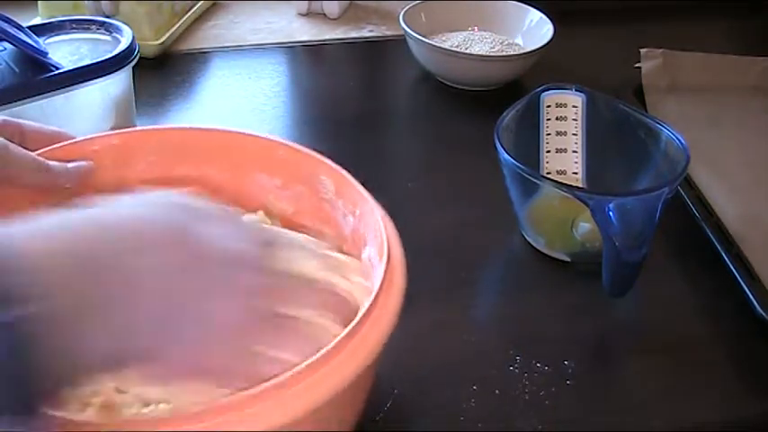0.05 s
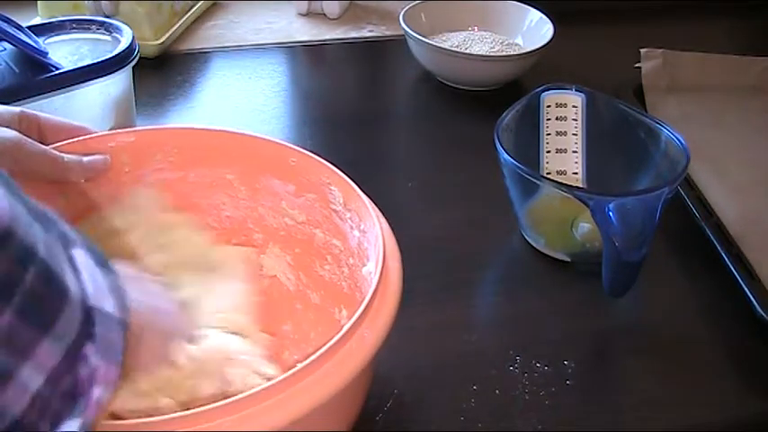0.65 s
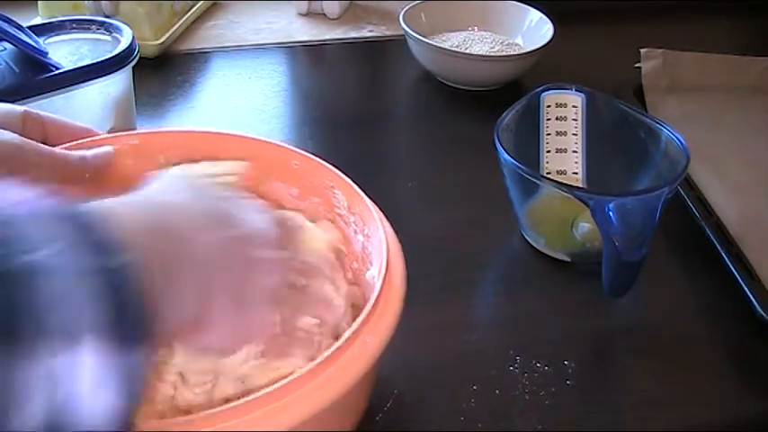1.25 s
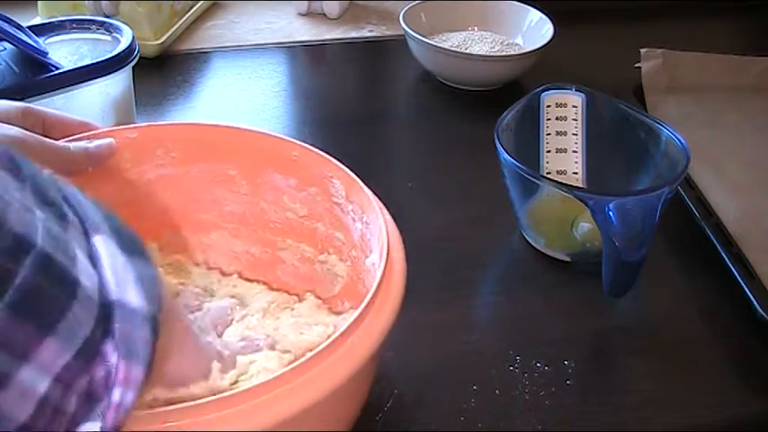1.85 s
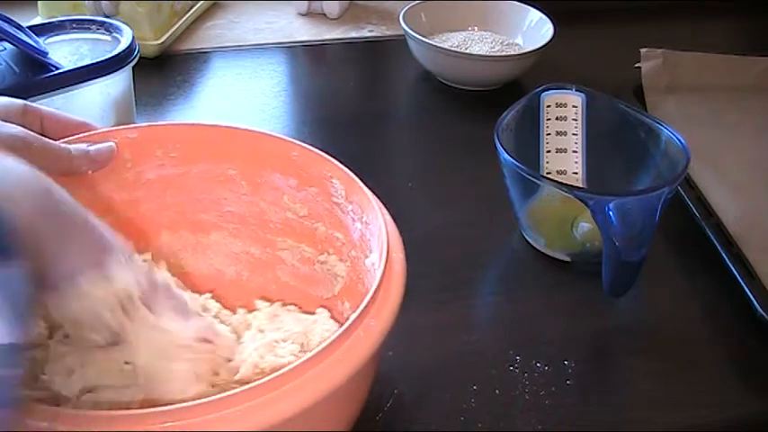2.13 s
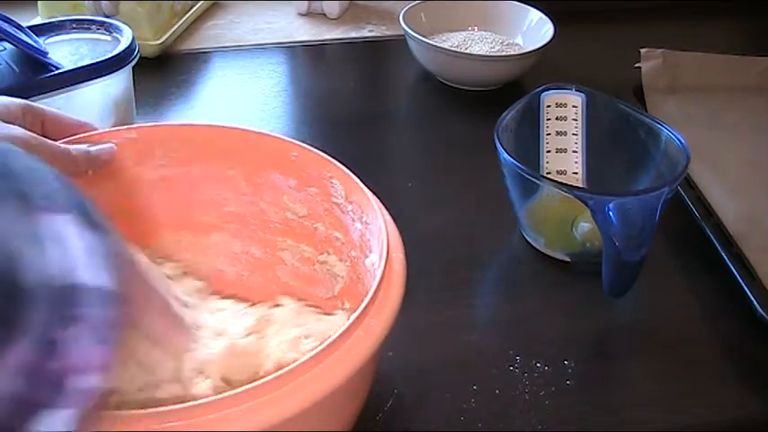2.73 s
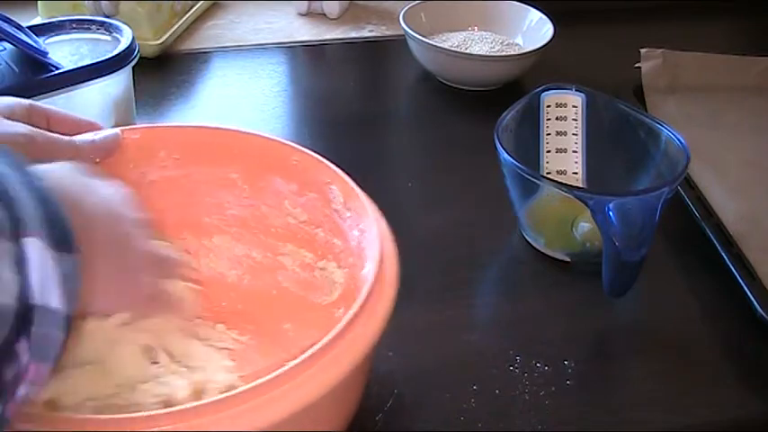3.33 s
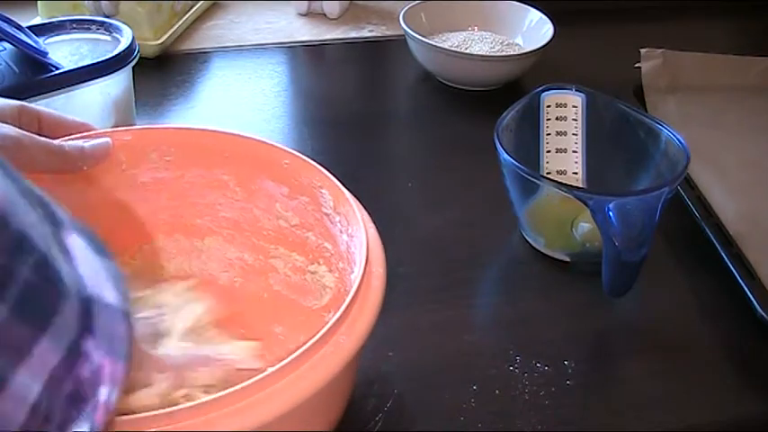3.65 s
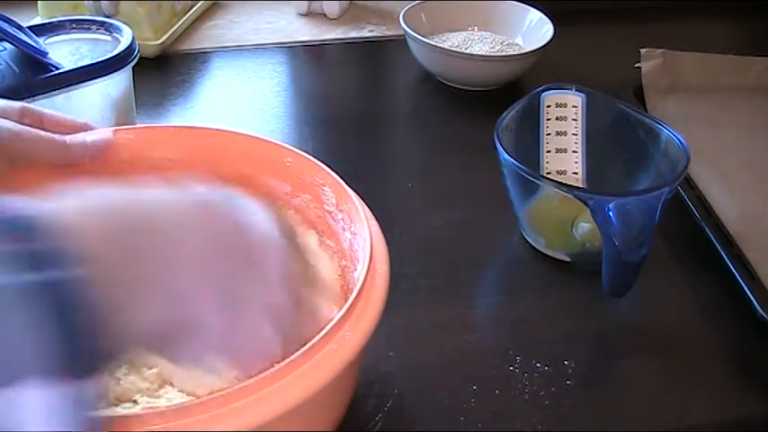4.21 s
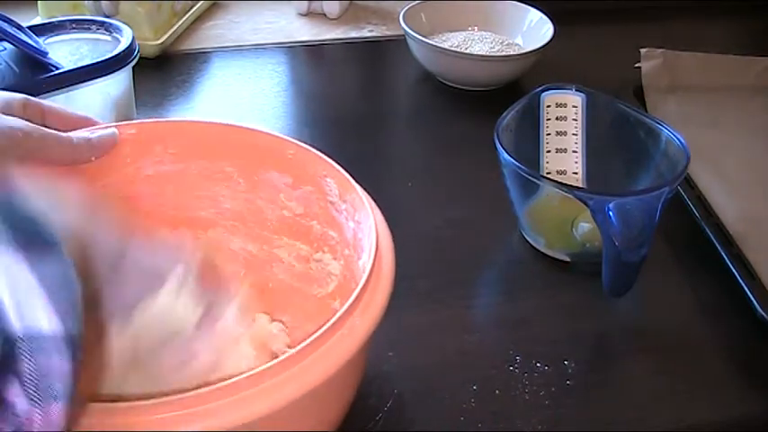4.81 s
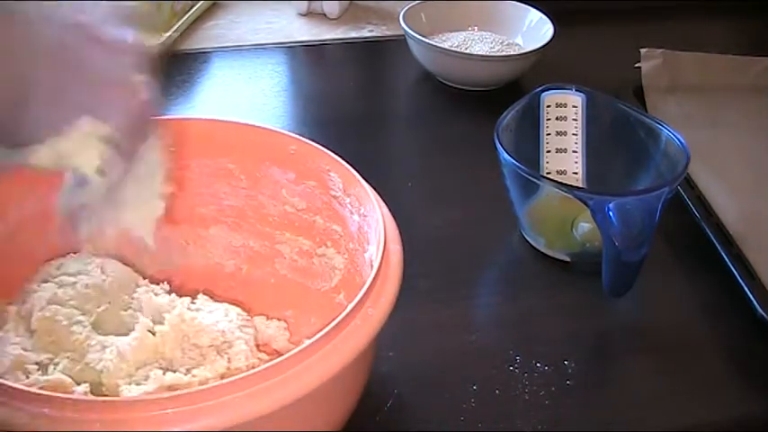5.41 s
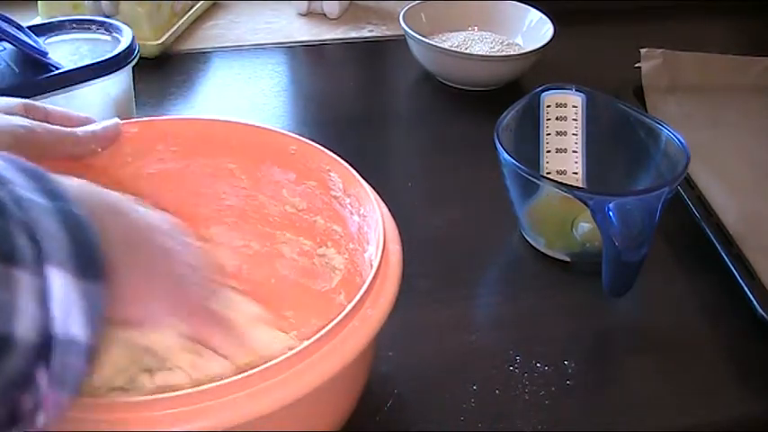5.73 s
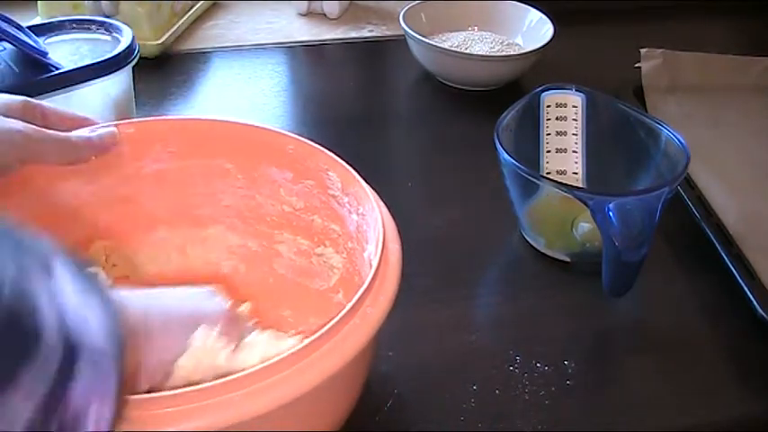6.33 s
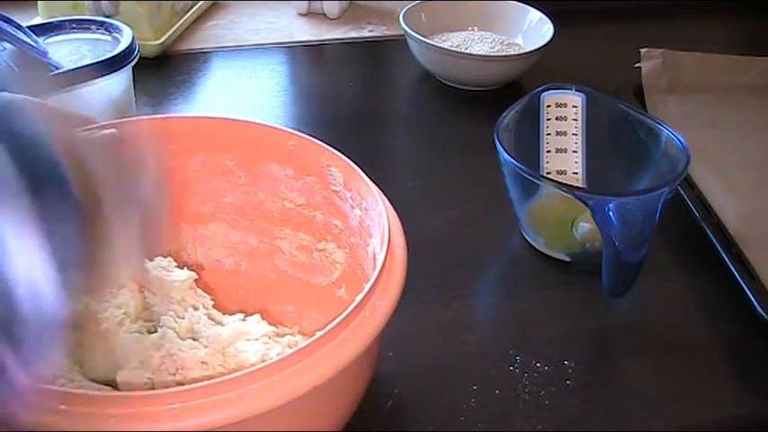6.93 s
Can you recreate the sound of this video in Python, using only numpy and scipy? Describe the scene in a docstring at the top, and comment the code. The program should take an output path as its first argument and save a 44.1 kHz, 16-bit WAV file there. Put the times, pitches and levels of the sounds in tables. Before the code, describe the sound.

Close up in a small kitchen, a plastic bowl bumps irregularly against a counter as a hand works dough inside it. Between the knocks come soft floury swishes, hollow pressing sounds and tiny tacky clicks. Thin, faint squeaks of skin on plastic appear shortly before the loudest thump and again later. The kneading goes on to a last light knock, heard in stereo with short room reverberation and a low hiss.

```python
"""A hand kneads soft, floury dough in a plastic bowl on a kitchen counter, close to a stereo microphone.
From the start, over a soft hiss, strokes brush the wall, drag and press the dough and rock the bowl so
that it knocks on the counter; sticky dough ticks as it lets go. Near 2 s skin squeaks on the plastic,
and just before 3 s the bowl lands hardest. More strokes and knocks follow, with squeaks again near 5 s
and a last light knock just before 7 s. The small room answers throughout."""
import sys
import numpy as np
from scipy import signal
from scipy.fft import rfft, irfft
from scipy.io import wavfile
from scipy.ndimage import uniform_filter1d

SR = 44100
rng = np.random.default_rng(int(sys.argv[2]) if len(sys.argv) > 2 else 0)


def persist_wave(psi):
    """Save psi, clipped to +-1, as 16-bit WAV."""
    counts = np.round(np.clip(psi, -1, 1) * 32767).astype(np.int16)
    wavfile.write(sys.argv[1], SR, np.atleast_2d(counts).T)


N = 307068


def undb(db):
    """Decibels to gain."""
    return 10 ** (np.asarray(db) / 20)


def unit_rms(x):
    """Scale to rms 1."""
    return x / np.sqrt(np.mean(x ** 2))


def wander(per_s):
    """A smooth random wobble with rms 1."""
    hold = max(int(SR / per_s), 1)
    steps = np.repeat(rng.standard_normal(N // hold + 1), hold)
    return unit_rms(uniform_filter1d(steps, hold)[:N])


def colour(x, curve, size=4096):
    """Minimum-phase EQ through (Hz, dB) points, keeping the power of white noise."""
    hz, db = np.transpose(curve)
    f = np.maximum(np.fft.rfftfreq(size, 1 / SR), 1)
    gain = undb(np.interp(np.log(f), np.log(hz), db))
    cepstrum = irfft(np.log(gain))
    cepstrum[1:size // 2] *= 2
    cepstrum[size // 2 + 1:] = 0
    response = irfft(np.exp(rfft(cepstrum)))
    return signal.fftconvolve(x, response / np.linalg.norm(response))[:len(x)]


def burst(t, t60, curve):
    """Decaying noise through an EQ curve."""
    return colour(rng.standard_normal(len(t)) * undb(-60 * t / t60), curve)


def envelope(t, length_s, rise_s, fall_db_per_s):
    """Smooth attack, hold until the length is over, then an even release in dB."""
    attack = np.sin(np.pi / 2 * np.clip(t / rise_s, 0, 1)) ** 2
    return attack * undb(-fall_db_per_s * np.maximum(t - length_s, 0))


def add(track, start_s, sound):
    """Mix a sound in at a time."""
    i = max(int(start_s * SR), 0)
    track[i:i + len(sound)] += sound[:max(N - i, 0)]


def pan(x, left_db):
    """Lean a source towards the left microphone."""
    return x * undb(np.array([[left_db], [-left_db]]) / 2)


# The warm noise floor. Each row: frequency in Hz, relative level in dB.
HISS_EQ = [(20, -12), (60, 1), (110, 1.5), (220, 3.5), (440, 1.5), (850, -4), (1700, -7), (3400, -8.5),
           (5800, -12.5), (8500, -15.5), (12500, -19.5), (15500, -25)]
def hiss(level_db=-54.5):
    """Each microphone has its own steady noise."""
    return undb(level_db) * np.array([colour(rng.standard_normal(N), HISS_EQ) for _ in range(2)])


# The room's reverb. Each row: frequency in Hz, relative level in dB, t60 in seconds, side minus mid in dB.
ROOM_BANDS = [(103, -10.5, 0.62, -24), (247, 3.5, 0.47, -13), (613, -4.5, 0.53, -7.5),
              (1200, -4.5, 0.3, -5.5), (3140, -9, 0.29, 3), (8930, -9.5, 0.087, 2.5), (14900, 5.5, 0.24, 4)]
def kitchen(x, wet_db=-4, predelay_s=0.0049, build_s=0.0014):
    """Reflections from cupboards and walls; the lows stay longest and the highs spread widest."""
    t = np.arange(SR // 2) / SR
    log_f = np.log(np.maximum(np.fft.rfftfreq(len(t), 1 / SR), 1))
    band_hz = np.transpose(ROOM_BANDS)[0]
    spectrum = rfft(rng.standard_normal((2, len(t))))
    onset = 1 - np.exp(-np.maximum(t - predelay_s, 0) / build_s)
    response = 0
    for share, (_, db, t60, side_db) in zip(np.eye(len(band_hz)), ROOM_BANDS):
        fade = onset * undb(-60 * t / t60)
        band = irfft(spectrum * np.interp(log_f, np.log(band_hz), share), len(t))
        response = response + band * undb([[db], [db + side_db]]) * fade / np.linalg.norm(fade)
    mid, side = (signal.fftconvolve(x, r)[:N] for r in response)
    return undb(wet_db) * np.array([mid + side, mid - side])


# Thin skin squeaks, two followed by a faint tone ringing on in the room (the rows at 2.12 and 5.198 s).
# Each row: start and length in seconds, first and last pitch in Hz, glide bend (under 1 moves early),
# fundamental in dB, second and third harmonics in dB relative to it, jitter as a share of the pitch.
SQUEAKS_AND_TAILS = [(1.868, 0.075, 2820, 2790, 0.9, -65, 8.5, 12, 0.026),
                     (1.955, 0.038, 2940, 2940, 1, -60, 8, 10, 0.014),
                     (1.983, 0.059, 2865, 2873, 0.9, -60, 9.5, 13, 0.0079),
                     (2.05, .065, 2910, 3010, 0.98, -57.5, 2, 1.5, .016),
                     (2.113, .02, 3150, 3400, 1, -55, -14, -20, .03),
                     (2.12, 0.067, 2970, 3006, 1, -67, 6.5, 4, .014),
                     (2.199, 0.173, 4430, 4380, 0.9, -65, -2, -23, .07),
                     (4.992, .038, 3150, 3560, 0.93, -49.5, -3, -7, .018),
                     (5.034, 0.15, 3380, 3636, 0.47, -51, -2, -13.5, .007),
                     (5.198, 0.09, 3610, 3590, 0.91, -65, -3, -18, .01),
                     (6.446, 0.021, 3640, 3650, 0.86, -51.5, -0.5, -16, 0.015)]
def squeaks(flutter_db=3, fourth_vs_second_db=-24, rasp_radians=0.18):
    """Wavering, gliding tones: stick-slip squeaks on plastic, and two faint tails of room ring."""
    out, t = np.zeros(N), np.arange(SR // 2) / SR
    waver, flutter = wander(700), undb(flutter_db * wander(170))
    rasp = rasp_radians * wander(1500)  # each cycle comes a little early or late
    for start_s, length_s, first_hz, last_hz, bend, db, second_db, third_db, jitter in SQUEAKS_AND_TAILS:
        now = np.minimum(int(start_s * SR) + np.arange(len(t)), N - 1)
        hz = first_hz + (last_hz - first_hz) * np.minimum(t / length_s, 1) ** bend
        phase = 2 * np.pi * np.cumsum(hz * (1 + jitter * waver[now])) / SR + rasp[now]
        harmonics_db = [0, second_db, third_db, second_db + fourth_vs_second_db]
        tone = np.sqrt(2) * sum(undb(db + h) * np.sin(k * phase) for k, h in enumerate(harmonics_db, 1))
        shape = envelope(t, length_s, rise_s=0.0041, fall_db_per_s=448)
        add(out, start_s, tone * flutter[now] * shape)
    return out


# The bright snap of a tick. Each row: frequency in Hz, relative level in dB.
TICK_EQ = [(500, -12), (2500, -15), (5000, -7.5), (8700, 5), (11500, -10.5), (15500, -12)]
# Sticky dough letting go. Each row: start in seconds, peak in dB before the trim.
DOUGH_TICKS = [(0.275, -27), (0.301, -22.5), (0.3187, -26), (0.422, -32), (0.7244, -27), (0.7444, -39),
               (0.791, -27), (0.812, -23), (0.8277, -22), (2.405, -37), (3.3414, -34), (3.418, -24.5),
               (3.4436, -30), (4.2044, -26), (4.591, -31.5), (4.68, -32.5), (4.7922, -33), (5.37, -37)]
def ticks(t60=0.0051, trim_db=-7):
    """Small tacky patches snap off skin and plastic."""
    out, t = np.zeros(N), np.arange(SR // 50) / SR
    for start_s, db in DOUGH_TICKS:
        snap = burst(t, t60, TICK_EQ)
        add(out, start_s, undb(db + trim_db) * snap / np.abs(snap).max())
    return out


def crackle(motion, per_s=70, spread_db=5, gain_db=-47):
    """Fainter ticks of stretching dough, stronger while the hand moves."""
    popping = rng.random(N) < per_s / SR
    sizes = undb(spread_db * np.minimum(rng.exponential(size=N), 3))
    follow = (motion / np.median(motion)) ** .7
    return colour(popping * sizes, TICK_EQ) * undb(gain_db) * follow


# The hand never quite stops. Three floor levels in dB: brush, drag, press.
RESTING_LEVELS = [-71, -77.5, -70]
# Slow leans into the dough. Each row: start and length in seconds, then brush, drag and press in dB.
HAND_PUSHES = [(0.124, 0.092, -45.5, -46.5, -52.5), (0.464, 0.14, -54.5, -58, -59),
               (0.76, 0.13, -51, -53, -51.5), (1.148, 0.15, -46, -46, -50), (1.394, 0.29, -58.5, -59, -65),
               (1.744, 0.3, -53, -58.5, -54), (2.586, 0.1, -47.5, -59, -55), (3.134, 0.21, -51, -50, -49.5),
               (3.717, 0.17, -52, -69, -66), (4.146, 0.28, -50.5, -48.5, -56.5),
               (4.936, 0.21, -54, -61, -64), (5.3, .2, -90, -65, -64.5), (5.545, 0.31, -55, -59, -61),
               (6.318, 0.22, -54.5, -60.5, -56)]
# Quick sweeps along the wall. Each row: start, rise and length in seconds, brush, drag and press in dB.
FINGER_SWIPES = [(0, 0.005, .12, -44.5, -40.5, -45.5), (0.149, 0.052, 0.032, -52, -39, -42.5),
                 (0.576, 0.024, .085, -68, -51.5, -48.5), (0.705, .03, 0.12, -52.5, -54.5, -55),
                 (0.8, .012, 0.024, -45.5, -50, -53), (1.007, 0.026, 0.045, -55.5, -60, -59),
                 (1.128, 0.036, 0.044, -60, -48.5, -53), (1.195, 0.053, 0.078, -44, -42, -52),
                 (1.659, 0.088, 0.08, -50, -39, -46.5), (1.85, 0.076, 0.098, -53, -55.5, -48.5),
                 (2.395, 0.028, 0.063, -58.5, -57.5, -56.5), (2.982, 0.016, 0.048, -47.5, -42.5, -55),
                 (3.01, 0.055, 0.13, -38, -40.5, -50), (3.198, 0.024, 0.057, -66, -44, -56),
                 (3.539, .033, 0.047, -47, -68, -61), (3.615, 0.059, 0.052, -57.5, -44, -51.5),
                 (3.747, 0.023, 0.04, -66, -50.5, -53), (4.109, .02, 0.036, -56, -51, -59),
                 (4.236, 0.046, 0.072, -38.5, -45, -53), (4.475, 0.024, 0.058, -68, -50.5, -49),
                 (4.864, 0.045, 0.064, -51.5, -41.5, -47.5), (5.525, 0.036, 0.092, -57.5, -44, -46.5),
                 (5.815, .035, 0.037, -54.5, -62, -62), (6.084, 0.027, 0.087, -62, -57.5, -59),
                 (6.21, .07, 0.1, -49, -43, -51), (6.368, .035, 0.029, -46.5, -50.5, -55),
                 (6.879, 0.03, 0.047, -40.5, -47.5, -52)]
def hand_effort():
    """Level curves for brush, drag and press; pushes and swipes add in power."""
    t = np.arange(SR) / SR
    pushes = [(start_s, envelope(t, length_s, rise_s=0.06, fall_db_per_s=79), levels_db)
              for start_s, length_s, *levels_db in HAND_PUSHES]
    swipes = [(start_s, envelope(t, length_s, rise_s, fall_db_per_s=268), levels_db)
              for start_s, rise_s, length_s, *levels_db in FINGER_SWIPES]
    power = np.outer(undb(RESTING_LEVELS) ** 2, np.ones(N))
    for start_s, shape, levels_db in pushes + swipes:
        for layer, db in zip(power, levels_db):
            add(layer, start_s, (undb(db) * shape) ** 2)
    return np.sqrt(power)


def friction(curve, slips_per_s, spread_db, judder_db):
    """Dense tiny slips of uneven size; the grip judders as the hand moves."""
    slipping = rng.random(N) < slips_per_s / SR
    sizes = undb(spread_db * np.minimum(rng.exponential(size=N), 4))
    slips = slipping * sizes * rng.standard_normal(N)
    return unit_rms(colour(slips, curve) * undb(judder_db * wander(70)))


# Airy floury brush, coarse drag and the shell's hollow murmur under a press.
# Each row: frequency in Hz, relative level in dB.
BRUSH_EQ = [(400, -12.5), (1500, -7.5), (2800, -2), (4000, 3), (5200, -1.5), (7000, 3), (8700, 2),
            (10000, -5), (11500, -15.5), (15500, -22.5)]
DRAG_EQ = [(300, -13.5), (1000, -4), (1300, -0.5), (1750, 4.5), (2300, 1.5), (2900, 1.5), (3400, -1),
           (3900, -2), (4700, -7.5), (9000, -30.5)]
PRESS_EQ = [(40, -12), (100, -9), (200, -2.5), (400, -3), (560, 6.5), (680, 2), (790, -2.5), (980, 6),
            (1200, -12.5), (2500, -26)]
def kneading(brushing, dragging, pressing):
    """Three friction layers ride the hand's effort as it brushes the wall and works the dough."""
    brush = brushing * friction(BRUSH_EQ, slips_per_s=9800, spread_db=2, judder_db=1.8)
    drag = dragging * friction(DRAG_EQ, slips_per_s=6000, spread_db=0, judder_db=1.57)
    press = pressing * friction(PRESS_EQ, slips_per_s=2800, spread_db=1.5, judder_db=1.83)
    return brush, drag, press


def ring(modes, t, detune, scatter_db):
    """Damped modes of alternating sign; the dough lies differently at each blow and shifts them."""
    hz, db, t60 = np.transpose(modes)[:, :, None]
    sign = (-1) ** np.arange(len(modes))[:, None]
    shift, size = rng.standard_normal((2, len(modes), 1))
    decay = undb(db + scatter_db * size - 60 * t / t60)
    return np.sum(sign * decay * np.sin(2 * np.pi * hz * (1 + detune * shift) * t), axis=0)


# The bowl's base, damped by dough. Each row: frequency in Hz, relative level in dB, t60 in seconds.
BOWL_BASE_MODES = [(284, -6, 0.025), (437, -4.5, 0.022), (680, -4.5, 0.014), (1020, -5.5, 0.036),
                   (1440, -13.5, 0.022), (1605, -12.5, 0.038), (2090, -1, 0.018), (3260, -18, 0.011)]
def bowl_base(t, corner_hz, low_cut_hz=210, chatter_per_s=900, chatter_db=-22, chatter_t60=0.36):
    """The base lands with a dull clack and its rim chatters briefly as it settles."""
    clack = ring(BOWL_BASE_MODES, t, detune=.012, scatter_db=.8)
    contacts = (rng.random(len(t)) < chatter_per_s / SR) * rng.standard_normal(len(t))
    chatter = signal.fftconvolve(clack, contacts * undb(chatter_db - 60 * t / chatter_t60))[:len(t)]
    # a softer landing takes away the treble, and the small shell radiates no deep bass
    band_hz = [low_cut_hz, np.clip(corner_hz, 2 * low_cut_hz, SR / 4)]
    return signal.sosfilt(signal.butter(2, band_hz, "bandpass", fs=SR, output="sos"), clack + chatter)


# The boom of the counter top. Each row: frequency in Hz, relative level in dB, t60 in seconds.
COUNTER_TOP_MODES = [(62.2, -22.5, 0.68), (105, -29, 0.045), (131, 5, 0.086), (133.2, -13.5, 0.59),
                     (164, -39, 0.06), (216, -3.5, 0.15), (262, -30, 0.072), (383, -1.5, 0.066)]
# The cabinet shuddering under it. Each row: frequency in Hz, relative level in dB.
CABINET_EQ = [(25, -24), (50, -3), (78, -11), (110, 5.5), (220, 0), (400, -10.5), (600, -8), (1200, -22.5),
              (4000, -79)]
def counter_thud(t, rise_s=0.0075, shudder_db=-12, shudder_t60=0.66):
    """The heavy counter answers a little late; the cabinet's many close modes blur into a rumble."""
    shudder = undb(shudder_db) * burst(t, shudder_t60, CABINET_EQ)
    boom = ring(COUNTER_TOP_MODES, t, detune=0.023, scatter_db=1.0)
    return (boom + shudder) * (1 - np.exp(-t / rise_s))


# The ring of the bowl's free wall. Each row: frequency in Hz, relative level in dB, t60 in seconds.
BOWL_WALL_MODES = [(553.7, 0, 0.04), (594.4, -4.5, 0.069), (681, -12.5, 0.14), (856, -14.5, 0.053),
                   (1090, -23.5, 0.073), (1870, -10.5, 0.036)]
# The crack of plastic slapping the hard top. Each row: frequency in Hz, relative level in dB.
CRACK_EQ = [(60, -27), (300, -0.5), (1200, 3.5), (2400, -1.5), (3100, 11), (4200, -2.5), (8500, -8.5),
            (11500, -29), (15500, -41)]
# The bowl's landings. Each row: start in seconds, base gain in dB, the base's treble corner in Hz,
# then gains in dB for counter thud, wall ring and crack.
BOWL_KNOCKS = [(0.004, -44, 603, -36.5, -52, -70), (0.344, -21.5, 680, -36, -24, -42),
               (0.5955, -26, 1410, -37.5, -30, -57), (0.783, -37, 1200, -46, -33, -58),
               (0.8177, -29.5, 2020, -32.5, -23, -23), (1.5135, -16.5, 1120, -26, -62, -36),
               (2.878, -11.3, 1390, -22.5, -46, -29.5), (3.418, -39, 900, -38.5, -57, -45),
               (3.772, -41.5, 990, -48, -48, -45), (4.109, -33, 650, -43, -49, -62),
               (4.1951, -30, 2400, -42.5, -22.5, -28.5), (4.6286, -26, 790, -44, -31, -66),
               (5.195, -64, 1500, -68, -38.5, -53), (5.5189, -25.5, 2230, -30.5, -46, -26),
               (5.5349, -31, 1100, -44, -44, -42), (5.946, -37.5, 880, -53, -46, -62),
               (6.884, -37.5, 1005, -49, -52, -52)]
def knocks(wall_rise_s=0.0003, crack_t60=0.025):
    """The rocking bowl hits the counter: the base cracks down, the wall rings on, the counter thuds."""
    out, t = np.zeros(N), np.arange(SR // 2) / SR
    for start_s, base_db, corner_hz, thud_db, wall_db, crack_db in BOWL_KNOCKS:
        base = undb(base_db) * bowl_base(t, corner_hz)
        wall = undb(wall_db) * ring(BOWL_WALL_MODES, t, detune=.008, scatter_db=1.1)
        wall *= 1 - np.exp(-t / wall_rise_s)
        thud = undb(thud_db) * counter_thud(t)
        crack = undb(crack_db) * burst(t, crack_t60, CRACK_EQ)
        add(out, start_s, base + wall + thud + crack)
    return out


def scene():
    """The bowl stands a little to the left; all its sounds fill the same room."""
    brushing, dragging, pressing = hand_effort()
    brush, drag, press = kneading(brushing, dragging, pressing)
    bowl = knocks() + drag + press
    hand = brush + ticks() + crackle(brushing) + squeaks()
    reverb = kitchen(bowl + hand)
    return pan(bowl, left_db=2.5) + pan(hand, left_db=0.7) + pan(reverb, left_db=1.3) + hiss()


def record(dry, top_hz=15900):
    """A steep low-pass cuts the very top."""
    return signal.sosfilt(signal.ellip(10, .2, 70, top_hz, fs=SR, output="sos"), dry)


dry = scene()
out = record(dry)
persist_wave(out)
```